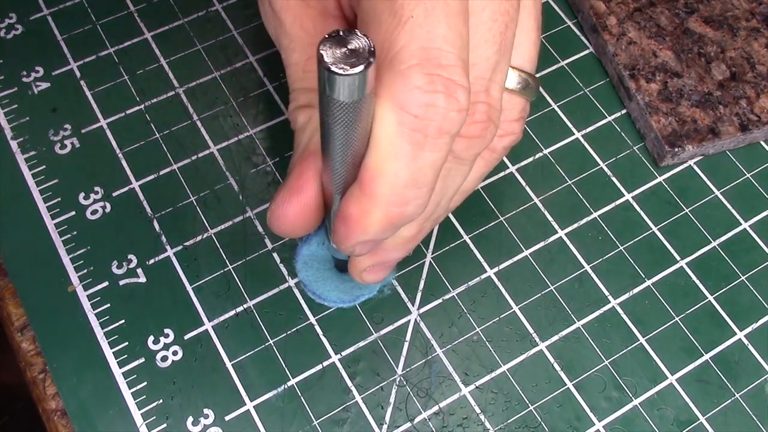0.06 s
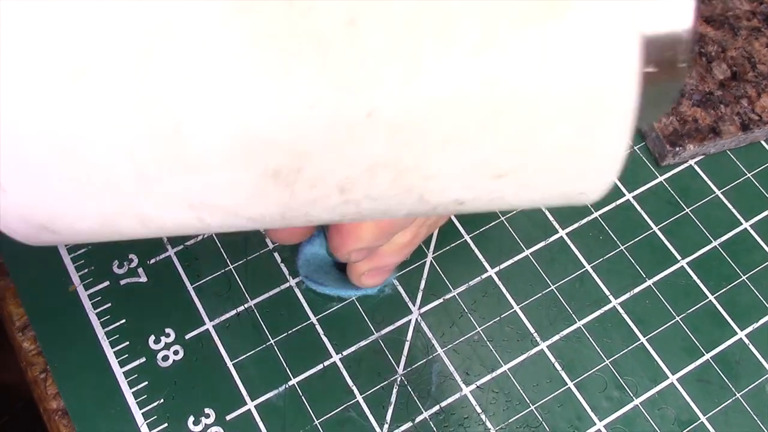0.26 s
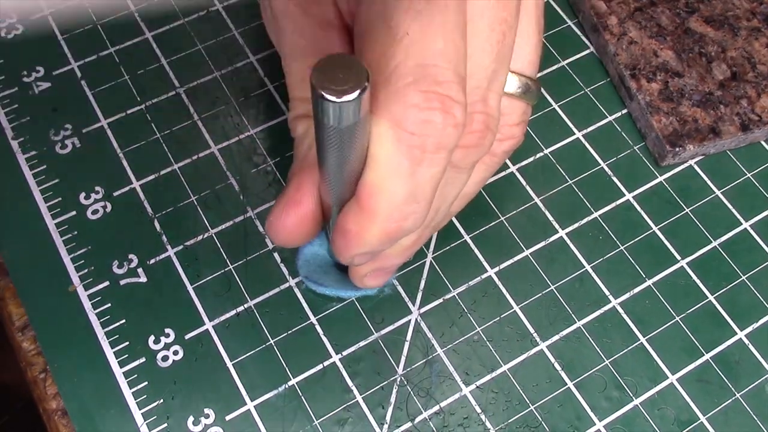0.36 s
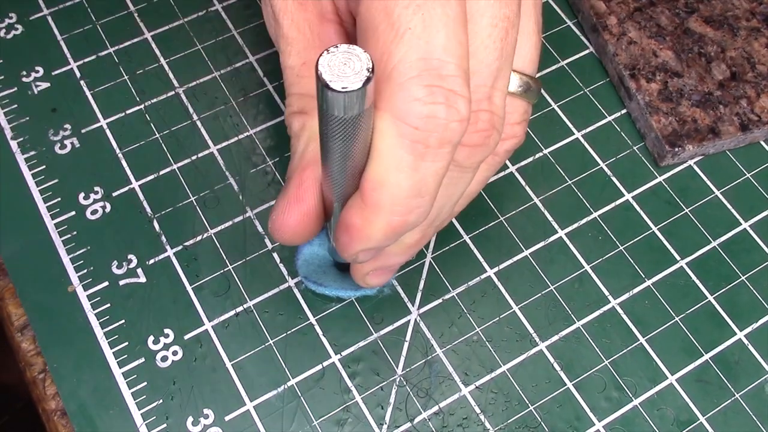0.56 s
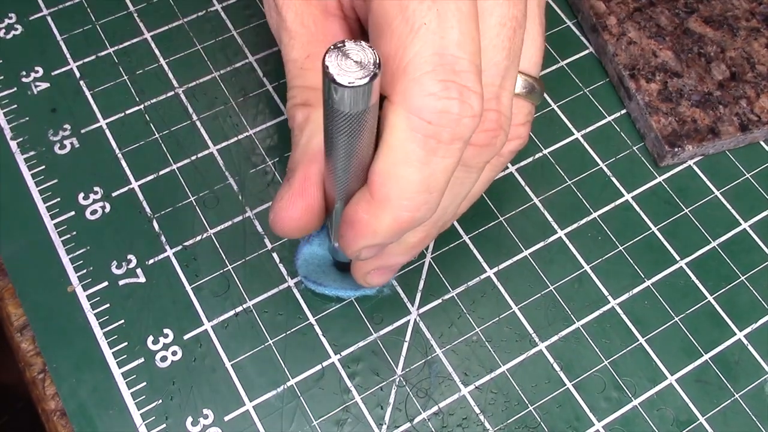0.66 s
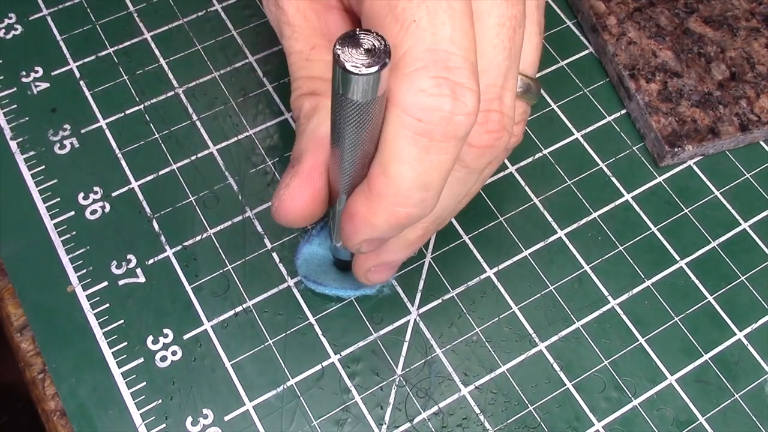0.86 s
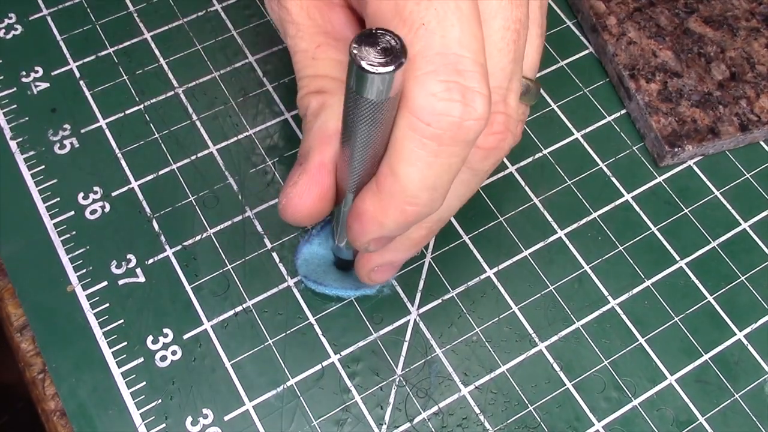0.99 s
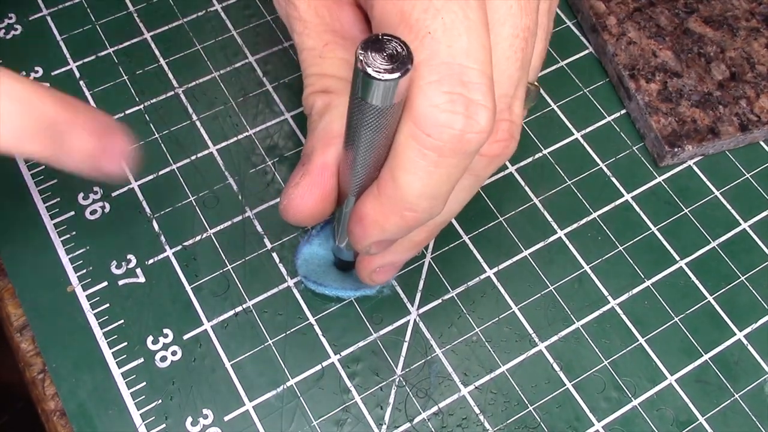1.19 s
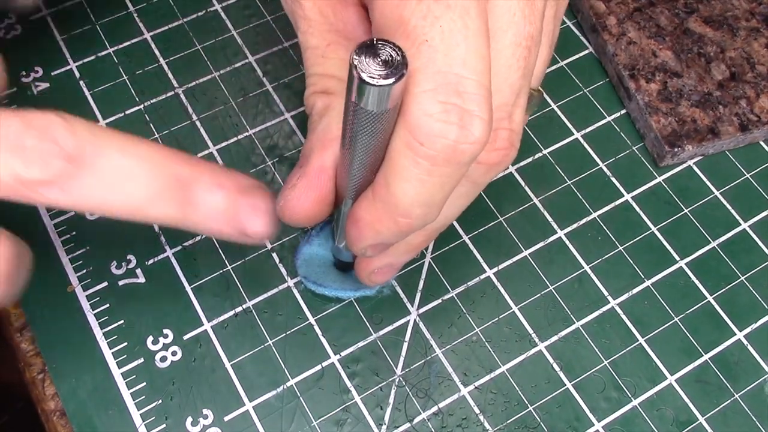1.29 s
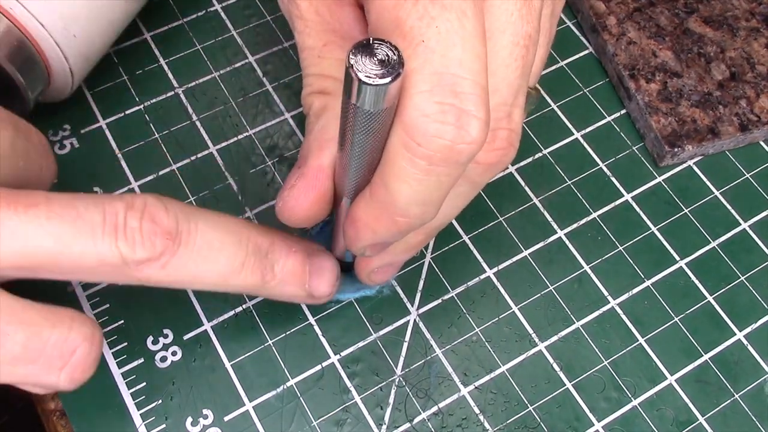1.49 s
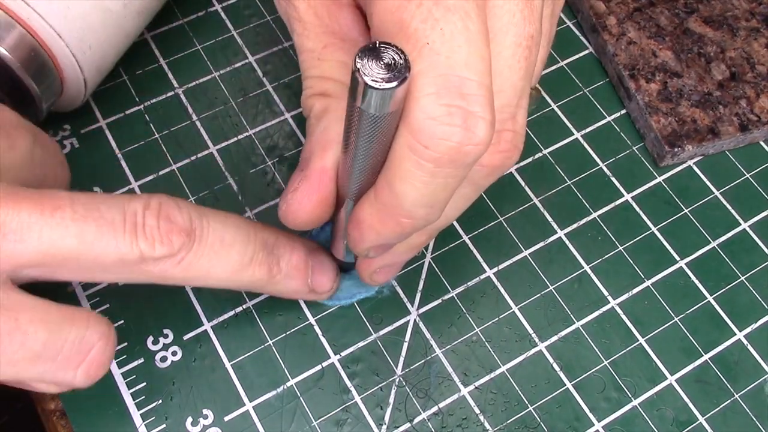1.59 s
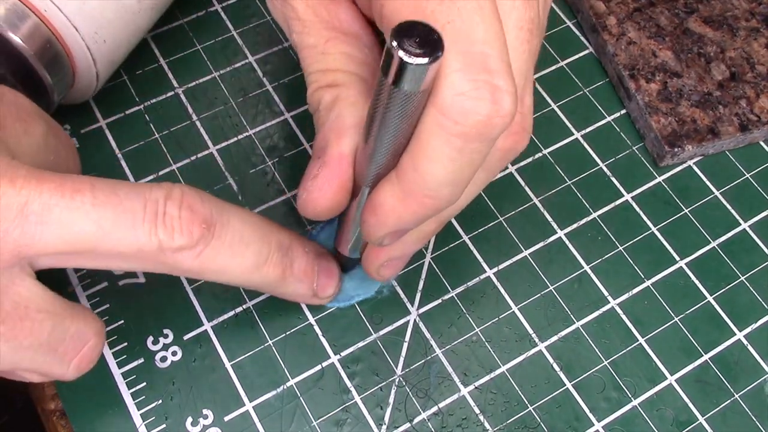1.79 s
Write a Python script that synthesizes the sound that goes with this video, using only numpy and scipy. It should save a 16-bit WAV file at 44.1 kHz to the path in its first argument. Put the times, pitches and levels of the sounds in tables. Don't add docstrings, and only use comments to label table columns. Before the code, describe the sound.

A mallet hits a steel hole punch once, a loud, slightly clipped crack with a woody bench thump and high metallic chatter; then near quiet, a dull knock and light finger taps, close in a small room.

```python
import sys
import numpy as np
from scipy import signal
from scipy.io import wavfile

SR = 44100
rng = np.random.default_rng(int(sys.argv[2]) if len(sys.argv) > 2 else 0)


def ratio(d):
    e = np.asarray(d, float) / 20
    return 10 ** e


def to_wav(s):
    ch = np.atleast_2d(s).T
    pcm = np.round(np.clip(ch, -1, 1) * 32767)
    wavfile.write(sys.argv[1], SR, pcm.astype(np.int16))


N = 81585
T = np.arange(N) / SR

# f/Hz, density level/dB
AIR_SPECTRUM = [(24, -50), (40, -15.5), (109, -6), (297, 1.5), (1270, -18), (1950, -15), (2320, -14.5),
                (12100, -31.5), (16000, -44)]
# f/Hz, density level/dB
RUMBLE_SPECTRUM = [(24, -50), (40, -19), (112, -11), (156, 1), (193, -6), (216, -4.5), (451, -11),
                   (2000, -31), (2600, -65.5), (4400, -120)]
# t/s, level/dB
ARM_MOVES = [
    (0.0, -57.5),
    (0.18, -58.5),
    (0.304, -45),
    (0.35, -63),
    (0.478, -87),
    (0.556, -67),
    (0.906, -77),
    (1.118, -67.5),
    (1.494, -59.5),
    (1.85, -69),
]
# f/Hz, level/dB
SIDE_AIR = [(60, -14), (240, -24), (950, -5.5), (3770, -14), (15000, -14.5)]
# t/s, length/s, level/dB
RUSTLES = [
    (.0, 0.22, -71),
    (0.805, 0.092, -73.5),
    (1.009, .04, -80),
    (1.213, 0.28, -73.5),
    (1.773, 0.085, -63.5),
]
# t/s, level/dB, f/Hz, t60/s
TICKS = [(.597, -56.5, 1120, 0.032), (0.5978, -61, 1699, 0.016), (.762, -61, 2988, 0.0055),
         (.842, -67, 2000, 0.057), (0.842, -70, 5860, 0.023), (.865, -65, 5000, .003),
         (.886, -70, 5970, .003), (1.09, -66.5, 6000, 0.0028), (1.346, -55, 7050, 0.0024),
         (1.3883, -32, 2280, 0.011), (1.3884, -23.5, 700, .004), (1.3887, -29.5, 3950, 0.003),
         (1.3884, -30, 5770, 0.0024), (1.3884, -57, 10300, 0.0027), (1.398, -39, 4770, 0.0083),
         (1.5315, -43.5, 2245, 0.0086), (1.5317, -41.5, 890, 0.0068), (1.5349, -49.5, 3180, 0.012),
         (1.5329, -46, 888, .004), (1.5317, -55.5, 4600, 0.0044), (1.5726, -52, 2300, .005),
         (1.572, -45, 985, 0.0092), (1.7879, -39, 550, 0.017), (1.7874, -48, 3064, 0.012),
         (1.7902, -52.5, 3204, .01), (1.787, -52.5, 6000, .006), (1.787, -48.5, 8300, 0.005),
         (1.789, -50, 4700, .008), (1.7888, -52, 7200, 0.0087), (1.79, -48, 10500, 0.0045),
         (1.798, -62, 7000, .004), (1.5726, -54, 5070, .003), (1.5726, -60.5, 7400, 0.0028),
         (1.408, -48, 7000, 0.0036), (1.408, -57, 11900, .004), (1.416, -62, 12000, 0.0036),
         (1.4215, -59, 7500, .004)]
# f/Hz, level/dB, t60/s
BENCH_MODES = [(120.3, -4.5, .15), (161, -7.5, .15), (189, -4, 0.37), (197.8, -4, 0.24), (245, 1, 0.18),
               (284, 0, .28), (360.7, -8.5, 0.34), (496.5, 0.5, 0.27), (542, -2, 0.25), (626.7, -5, 0.26),
               (663, -9, 0.31), (870, -4.5, .22), (920, -6.5, .2), (968, -7.5, 0.17)]
# f/Hz, level/dB, t60/s
MALLET_MODES = [(232, 2.5, .06), (529, 0.5, 0.093), (631, 0.5, .05), (950, 2, 0.036), (1455, 0.5, .02),
                (2000, 3.5, 0.01), (2400, 2.5, 0.0068), (3480, 7, 0.01), (3850, 8, 0.0062),
                (4655, 1, 0.008), (6800, -9.5, 0.0019)]
# f/Hz, density level/dB
CRACK_SPECTRUM = [(400, -14), (900, 0), (3800, -11), (8000, -39), (12000, -33.5), (16000, -45)]
# f/Hz, density level/dB
ROOM_SPECTRUM = [(24, -76), (40, -39.5), (186, -4.5), (560, -2.5), (980, -9), (2200, -14.5), (4000, -25),
                 (7130, -36), (13300, -43), (15000, -66.5)]
# f/Hz, t60/s
ROOM_T60 = [(60, 0.75), (110, 0.34), (250, 0.33), (1000, 0.3), (4000, 0.33), (12000, 0.27)]
# f/Hz, level/dB
SIDE_HIT = [(60, -12), (125, -28.5), (300, -25.5), (1000, -19.5), (4000, -21.5), (8000, -24), (12000, -21)]
# t/s, click level/dB, ring level/dB
CHATTER = [(0.213, -58.5, -28.5), (.224, -58.5, -36), (0.235, -35.5, -49.5), (0.2435, -27.5, -30.5),
           (0.2544, -34, -31), (.262, -45.5, -40), (0.2742, -18.5, -35), (.2782, -11.5, -18),
           (0.282, -16, -34.5), (0.287, -43, -31.5), (0.293, -37, -37), (.2998, -16, -47),
           (0.311, -21, -51.5), (0.317, -27, -45), (.321, -35, -46), (0.362, -68, -56), (.417, -86, -74)]
# f/Hz, level/dB, t60/s
PUNCH_MODES = [(12998, 0, .062), (13021, -24, .22)]
# t/s, thud level/dB, thud f/Hz, click level/dB, tail level/dB
TAPS = [
    (1.3889, -12, 347.5, -28.5, -30),
    (1.407, -59, 303, -46, -79),
    (1.4185, -32.5, 300, -46, -50),
    (1.532, -32.5, 404, -42.5, -47.5),
    (1.538, -37, 347, -62, -85),
    (1.5719, -47, 393, -44, -58.5),
    (1.599, -54, 300, -72, -81.5),
    (1.7856, -37.5, 435, -37, -52.5),
    (1.798, -48.5, 300, -51, -53.5),
]
# f/Hz, level/dB, t60/s
TAP_MODES = [(175.1, -13, 0.082), (300, -7.5, 0.064), (120, -20.5, 0.12), (490, -34, 0.078),
             (247.9, -22, 0.26), (914, -7.5, 0.019), (670, -18.5, 0.047), (1120, -29, 0.023)]
# f/Hz, density level/dB
TAP_SPECTRUM = [(35, -51), (60, -11), (276, 2.5), (564, -7), (663, -10), (1420, -25), (2980, -28),
                (15000, -58)]

AIR_DB, RUMBLE_DB = -70, -1
WHINE_HZ, WHINE_T60_S, WHINE_DB = 4520, 0.012, -88
BLOW_S, BLOW_DB = 0.2026, 0.5
BENCH_DB, MALLET_DB = -8, -1.1
BOUNCE_S, BOUNCE_DB, BOUNCE_HZ, BOUNCE_T60_S = 0.234, -1, 870.7, 0.023
CRACK_DB, CRACK_T60_S = 4, 0.031
TAIL_DB, TAIL_RISE_S = -5.5, 0.0006
TAIL_BAND_DB, TAIL_BAND_T60_S = -19.5, 0.32
FLICKER_DB, FLICKER_HZ, PUNCH_PAN_DB = 2, 70, 1.5
THUD_T60_S, THUD_RISE_HZ = 0.048, 905
DULL_HZ, MIC_LOW_HZ, TOP_HZ = 13600, 70, 14900
LIMIT_DB, SQUEEZE, ATTACK_HZ, RELEASE_DB_PER_S = -11.5, 0.71, 64, 224
CLIP, CATCH_UP_S = 0.33, 0.005


def at_hz(points, hz):
    points = np.array(points)
    return np.interp(np.log(hz), np.log(points[:, 0]), points[:, 1])


def butter(x, hz, kind, order):
    return signal.sosfilt(signal.butter(order, hz, kind, fs=SR, output="sos"), x)


def click(s, db):
    x = np.full(N, 1e-18)
    x[int(s * SR)] = ratio(db)
    return x


def ring(x, hz, t60_s):
    r = ratio(-60 / (t60_s * SR))
    w = 2 * np.pi * hz / SR
    return signal.lfilter([0, np.sin(w)], [1, -2 * r * np.cos(w), r * r], x)


def ring_modes(x, modes):
    return sum(ratio(db) * (-1) ** k * ring(x, hz, t60_s) for k, (hz, db, t60_s) in enumerate(modes))


def dying(s, t60_s, rise_s=0.00051):
    out = np.zeros(N)
    i = int(s * SR)
    u = T[:min(N - i, int(2 * t60_s * SR))]
    out[i:i + len(u)] = (1 - np.exp(-u / rise_s)) * ratio(-60 * u / t60_s)
    return out


def noise(spectrum, side, envelope):
    out, power = 0, 0
    edges_hz = 45 * 2 ** np.arange(0, 8.6, 0.5)
    white = rng.standard_normal((2, 2, N))
    for k, (low, high) in enumerate(zip(edges_hz, edges_hz[1:])):
        if high < spectrum[0][0] or low > spectrum[-1][0]:
            continue
        mid, dif = butter(white[k % 2], [low, high], "band", order=2)
        hz = np.sqrt(low * high)
        gain = ratio(at_hz(spectrum, hz))
        power += gain ** 2 * (high - low) * 2 / SR
        stereo = mid + ratio(at_hz(side, hz)) * dif * [[1], [-1]]
        out = out + gain * envelope(hz) * stereo
    return out / np.sqrt(power)


def background():
    s, db = np.transpose(ARM_MOVES)
    whine = ring(rng.standard_normal(N), WHINE_HZ, WHINE_T60_S)
    whine = ratio(WHINE_DB) * whine / whine.std()
    air = ratio(AIR_DB) * noise(AIR_SPECTRUM, SIDE_AIR, lambda hz: 1)
    rumble = ratio(np.interp(T, s, db) + RUMBLE_DB) * noise(RUMBLE_SPECTRUM, SIDE_AIR, lambda hz: 1)
    return whine + air + rumble


def fingers():
    ticks = sum(ring(click(s, db), hz, t60_s) for s, db, hz, t60_s in TICKS)
    swell = sum(ratio(db) * np.sin(np.pi * np.clip((T - s) / length_s, 0, 1)) for s, length_s, db in RUSTLES)
    grains = rng.standard_normal((2, N)) * 2.23
    grains = grains * (rng.random(N) < 4000 / SR)
    return ticks + swell * butter(grains, [4000, 15000], "band", order=2)


def blow():
    hit = butter(click(BLOW_S, BENCH_DB), 1500, "low", order=1)
    modes = ring_modes(hit, BENCH_MODES) + ring_modes(click(BLOW_S, MALLET_DB), MALLET_MODES)
    bounce = ring(click(BOUNCE_S, BOUNCE_DB), BOUNCE_HZ, BOUNCE_T60_S)

    def crack_decay(hz):
        return dying(BLOW_S, CRACK_T60_S * (1000 / hz) ** 0.5, 0.0001)

    def room_decay(hz):
        return dying(BLOW_S, at_hz(ROOM_T60, hz), TAIL_RISE_S)

    crack = ratio(CRACK_DB) * noise(CRACK_SPECTRUM, SIDE_HIT, crack_decay)
    tail = ratio(TAIL_DB) * noise(ROOM_SPECTRUM, SIDE_HIT, room_decay)
    tail_band = butter(rng.standard_normal(N), [2350, 3420], "band", order=5)
    tail_band = tail_band / tail_band.std() * dying(BLOW_S, TAIL_BAND_T60_S, 0.018)
    tail = butter(tail + ratio(TAIL_BAND_DB) * tail_band, DULL_HZ, "low", order=26)
    return ratio(BLOW_DB) * (modes + bounce + crack + tail)


def punch():
    burst = sum(ratio(db) * dying(s, 0.0046) for s, db, _ in CHATTER) * rng.standard_normal(N)
    tone = 0
    for hz, mode_db, t60_s in PUNCH_MODES:
        envelope = sum(ratio(mode_db + db) * dying(s, t60_s, 0.0022) for s, _, db in CHATTER)
        tone = tone + envelope * np.sin(2 * np.pi * hz * T)
    flicker = butter(rng.standard_normal(N), FLICKER_HZ, "low", order=2)
    tone = tone * ratio(FLICKER_DB * flicker / flicker.std())
    clicks = butter(burst, [7600, 13400], "band", order=10)
    return (clicks + tone) * ratio([[-PUNCH_PAN_DB], [PUNCH_PAN_DB]])


def taps():
    r = np.exp(-2 * np.pi * THUD_RISE_HZ / SR)
    thuds = 0
    for s, db, hz, _, _ in TAPS:
        push = signal.lfilter([(1 - r) ** 2], [1, -2 * r, r * r], click(s + 0.0012, db))
        thuds = thuds - ring(push, hz, THUD_T60_S) + ring_modes(push, TAP_MODES)

    snaps = sum(ratio(db) * dying(s + 0.00022, 0.015) for s, _, _, db, _ in TAPS) * rng.standard_normal(N)
    snaps = butter(snaps, [800, 6000], "band", order=1)
    snaps = butter(snaps, 4500, "low", order=3)

    def tail_decay(hz):
        t60_s = 0.5 * at_hz(ROOM_T60, hz)
        return sum(ratio(db) * dying(s, t60_s, 0.00085) for s, _, _, _, db in TAPS)

    tails = noise(TAP_SPECTRUM, SIDE_HIT, tail_decay)
    return butter(thuds + tails, 80, "high", order=4) + snaps


def scene():
    strike = blow() + punch()
    quiet = taps() + fingers() + background()
    return strike + butter(quiet, DULL_HZ, "low", order=8)


def band_limit(x):
    return signal.sosfilt(signal.butter(12, 16490, fs=SR, output="sos"), x)


def record(dry):
    dry = butter(dry, MIC_LOW_HZ, "high", order=2)
    level_db = 20 * np.log10(np.abs(dry).max(axis=0) + 1e-9)
    over_db = np.maximum(level_db - LIMIT_DB, 0)
    release_db = RELEASE_DB_PER_S * T
    held_db = np.maximum.accumulate(over_db + release_db) - release_db
    r = np.exp(-2 * np.pi * ATTACK_HZ / SR)
    x = dry * ratio(-SQUEEZE * signal.lfilter([1 - r], [1, -r], held_db))
    ceiling = CLIP + np.clip(20 * (T - BLOW_S - CATCH_UP_S), 0, 1)
    x = x / (1 + np.abs(x / ceiling) ** 14) ** (1 / 14)
    mix = butter(x, TOP_HZ, "low", order=6)
    return band_limit(mix)


dry = scene()
out = record(dry)
to_wav(out)
```